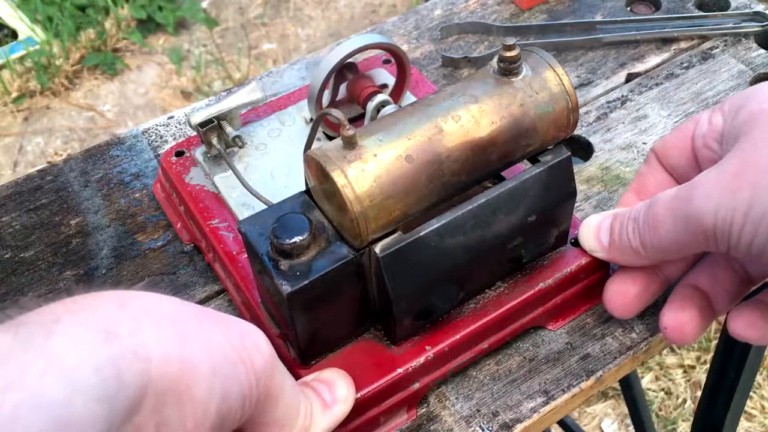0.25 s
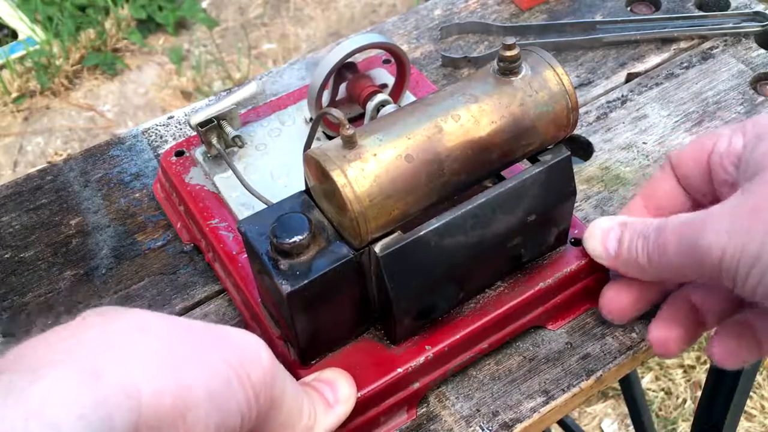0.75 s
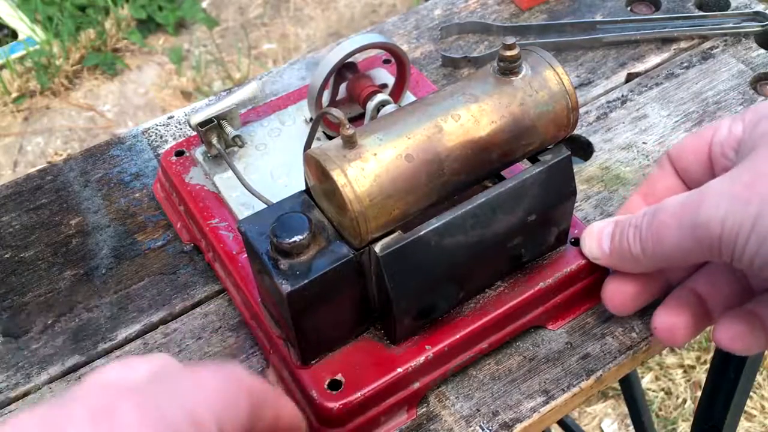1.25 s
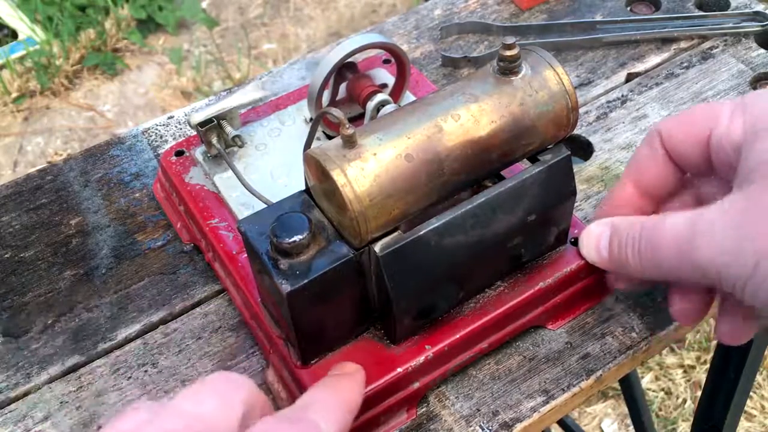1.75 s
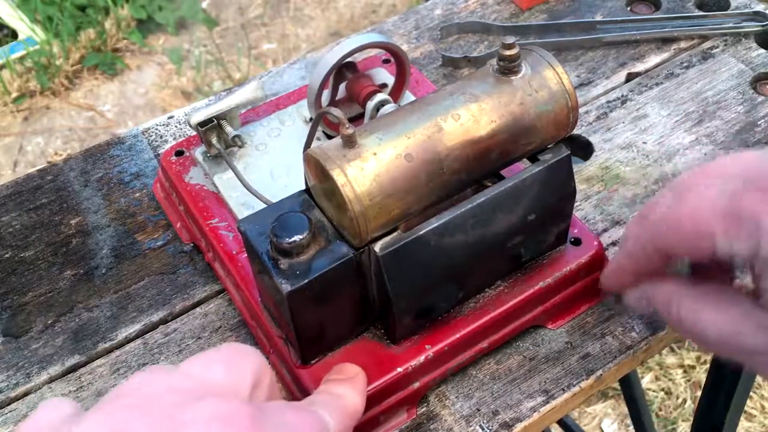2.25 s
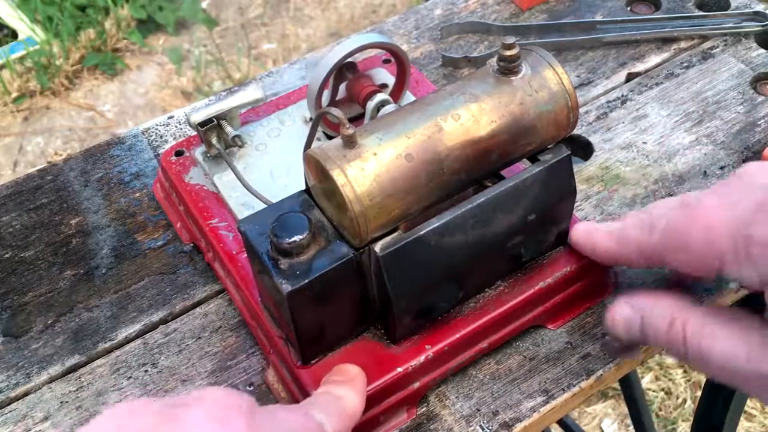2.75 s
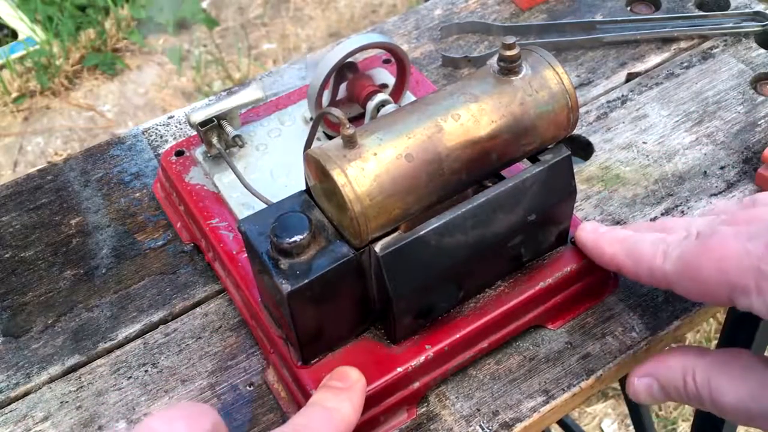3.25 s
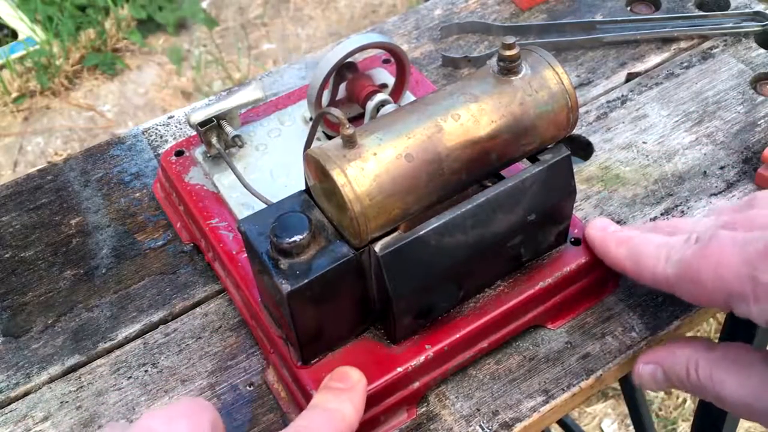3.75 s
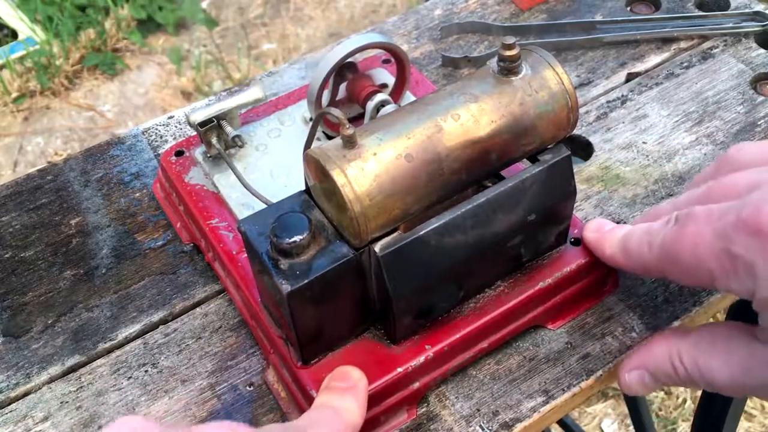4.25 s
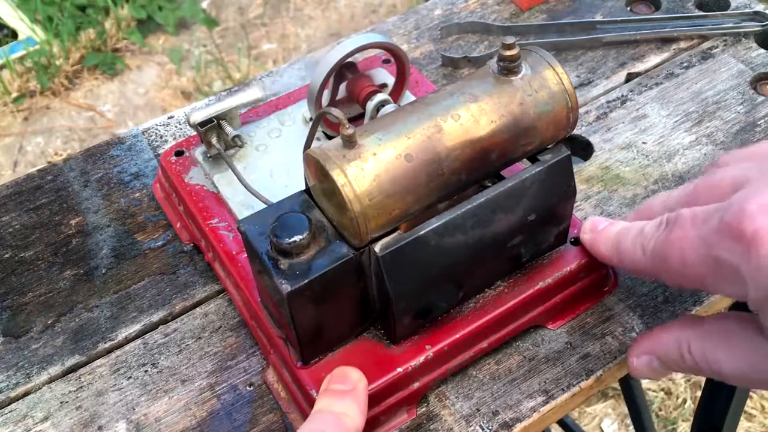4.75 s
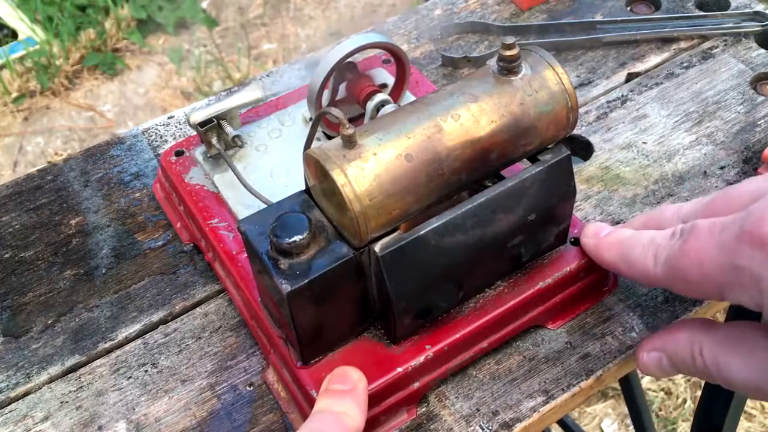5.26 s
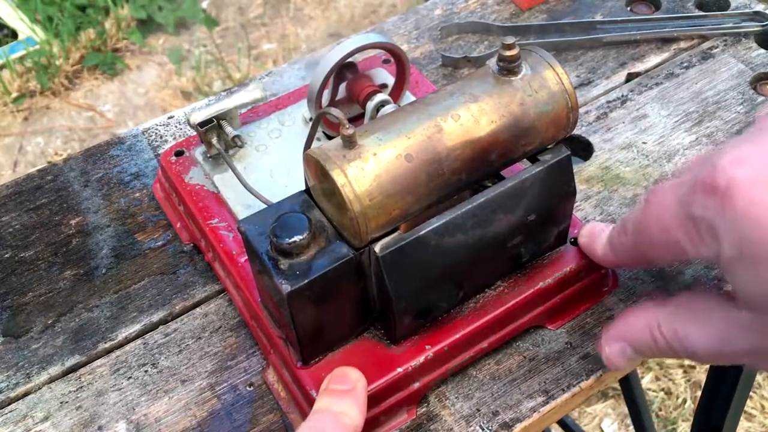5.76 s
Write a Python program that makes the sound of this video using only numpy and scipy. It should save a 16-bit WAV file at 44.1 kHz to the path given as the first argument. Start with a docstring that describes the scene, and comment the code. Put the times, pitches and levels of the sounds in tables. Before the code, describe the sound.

Close-up rapid metallic rattle of a miniature steam engine, hard-knocking at first, then slightly slower and gentler, with faint steam hiss outdoors.

```python
"""A toy steam engine runs on a wooden bench outdoors: fast and hard-knocking at first, a thumb on its base.
The loose crank chatters every turn, ringing the tin base, rim and small metal parts as resonances struck
by impulses; the bench thumps, steam spits as filtered noise, and low tones hum with the wheel.
From the first half second the slack now and then takes up with a hard clack. By three seconds the thumb
has eased, the wheel has slowed to about twenty turns a second, and the knocks are softer to the end."""
import sys
import numpy as np
from scipy import signal
from scipy.fft import rfft, irfft
from scipy.io import wavfile
from scipy.ndimage import uniform_filter1d

SR = 44100
rng = np.random.default_rng(int(sys.argv[2]) if len(sys.argv) > 2 else 0)


def output_pcm(signal):
    """Save a mono or channel-first signal as 16-bit PCM at the path in sys.argv[1].

    Samples are clipped to [-1, 1] before scaling.
    """
    pcm = np.clip(np.atleast_2d(signal).T, -1, 1) * 32767
    wavfile.write(sys.argv[1], SR, np.round(pcm).astype(np.int16))


N = 264600
TIME = np.arange(N) / SR
FREQ = np.fft.rfftfreq(8192, 1 / SR)
EASY_HZ = 20  # easy turning rate; levels and crank positions shift with the rate above it
CONTACT_HZ = 8350  # no contact is short enough to ring the parts much above this


def undb(db):
    """Decibels to gain."""
    return 10 ** (np.asarray(db) / 20)


def unit(x):
    """Scale to an rms of one."""
    return x / np.sqrt(np.mean(x ** 2))


def steady(x, size=17640):
    """Scale to an rms of one over a sliding window, by default every few turns."""
    return x / np.sqrt(uniform_filter1d(x ** 2, size=size))


def curves(table):
    """Each column of a table as a line through time."""
    s, *columns = np.transpose(table)
    return [np.interp(TIME, s, column) for column in columns]


def response(gain):
    """Causal (minimum-phase) impulse response with the given gain at each frequency."""
    cepstrum = irfft(np.log(gain + 1e-9))
    half = len(cepstrum) // 2
    cepstrum[1:half] *= 2
    cepstrum[half + 1:] = 0
    return irfft(np.exp(rfft(cepstrum)))


def body(modes):
    """Impulse response of a set of resonances, softened by contact time, with a peak of one."""
    power = 0
    for hz, width, db in modes:
        detune = (FREQ - hz) / (0.53 * width)
        power = power + (undb(db) / (1 + detune ** 2)) ** 2
    contact = 1 / (1 + (FREQ / CONTACT_HZ) ** 8)
    ring = response(np.sqrt(power * contact))
    return ring / np.abs(ring).max()


def through(x, ring):
    """Pass a signal through an impulse response."""
    return signal.fftconvolve(x, ring)[:N]


def gripped(force, modes, grip):
    """Ring resonances whose balance changes under the thumb."""
    free = body([(hz, width, db) for hz, width, db, change_db in modes])
    pressed = body([(hz, width, db + change_db) for hz, width, db, change_db in modes])
    share = np.clip(grip, 0, 1)
    return through(force * (1 - share), free) + through(force * share, pressed)


def noise(points):
    """Noise shaped to a spectrum, with an rms of one."""
    hz, db = np.transpose(points)
    gain = undb(np.interp(np.log(FREQ + 1), np.log(hz), db))
    return unit(through(rng.standard_normal(N), response(gain)))


def taps(times, sizes):
    """A train of single impulses."""
    inside = (times >= 0) & (times < (N - 1) / SR)
    return np.bincount((times[inside] * SR).astype(int), sizes[inside], N)


def sparse_contacts(per_second):
    """Tiny impacts at random moments, pushing either way."""
    return (rng.random(N) < per_second / SR) * rng.choice([-1, 1], N)


def window(turn, position, width):
    """Opens smoothly once a turn around a crank position."""
    away = (turn - position + .5) % 1 - .5
    return np.exp(-.5 * (away / width) ** 2)


def each_turn(turn, position):
    """A new random value for every pass of a crank position."""
    return rng.standard_normal(256)[np.floor(turn - position + 1.5).astype(int)]


def passes(turn, position):
    """The samples at which the crank passes a position."""
    return np.flatnonzero(np.diff(np.floor(turn - position)) > 0)


def blows(turn, position, scatter_db, jitter_s):
    """One impulse each time the crank passes a position."""
    at = passes(turn, position)
    chance = rng.standard_normal((len(at), 2))
    return taps(at / SR + jitter_s * chance[:, 0], undb(scatter_db * chance[:, 1]))


# spectrum of the open air and burner: (f/Hz, relative level/dB)
AIR_SPECTRUM = [(20, -12), (45, -2), (80, -17), (240, -1), (330, 1.5), (450, -1.5), (700, 6.5), (2000, -9),
                (5000, -12), (9000, -28.5), (16000, -47)]


def open_air():
    """Open air and burner: an unchanging bed of shaped noise."""
    return undb(-45.0) * noise(AIR_SPECTRUM)


# spectrum of the exhaust steam as the microphone hears it, dipping deeply near 10.4 kHz: (f/Hz, relative
# level/dB)
STEAM_SPECTRUM = [(120, -22), (500, -3.5), (1500, 2.5), (4400, 5), (5500, 0), (7000, -8), (9500, -12.5),
                  (10400, -27.5), (11300, -11), (12500, -20.5), (14000, -27), (16000, -65)]


def exhaust(turn, hz):
    """Wet steam leaves the port once a turn, some leaks past the piston, and a faint hiss never stops."""
    puff = window(turn, .42 - 0.028 * (hz - EASY_HZ), width=0.079)
    puff = puff * undb(2.3 * each_turn(turn, .42))  # no two puffs equally strong
    leak = undb(-4.0) * window(turn, 0.096, width=0.07)  # on the power stroke
    return undb(-42.0) * noise(STEAM_SPECTRUM) * (puff + leak + undb(-8.5))


# soft low bumps while the hands shift their grip: (t/s, level/dB, f/Hz, length/s)
GRIP_BUMPS = [(0.179, -39.5, 54.7, 0.0099), (.183, -51, 104, 0.0087), (0.334, -49, 66.4, 0.023),
              (0.45, -47, 49.4, .025), (0.545, -49, 59.4, .016), (1.05, -56, 55, .025),
              (2.065, -47, 99, 0.014), (2.067, -43, 165, 0.0064), (2.402, -52, 90, 0.012)]


def bumps():
    """Dull thuds: low sine tones under short bell-shaped swells."""
    thuds = 0
    for s, db, hz, length in GRIP_BUMPS:
        swell = np.exp(-.5 * ((TIME - s) / length) ** 2)
        tone = np.sqrt(2) * np.sin(2 * np.pi * (hz * TIME + rng.random()))
        thuds = thuds + undb(db) * swell * tone
    return thuds


# hum of the flywheel's unbalance: (multiple of the turning rate, level/dB)
HUM_TONES = [(4, -67), (5, -66.5), (7, -63.5), (9, -65), (11, -63.5), (14, -61), (16, -61.5), (17, -61),
             (18, -65)]
# three low tones that swell and fade: (t/s, near 160 Hz level/dB, near 295 Hz level/dB, near 325 Hz level/dB)
DRONE_LEVELS = [(0, -72, -48.5, -60), (.5, -70, -54, -71), (.8, -71, -71, -50), (1.2, -71, -59, -50),
                (1.7, -60, -74, -62), (2.6, -57.5, -62, -54), (3.25, -57, -74, -57), (3.7, -59.5, -77, -74),
                (4.3, -60.5, -81, -57), (4.7, -58, -60, -58), (5.3, -63.5, -69, -63), (6, -63, -77, -53)]
# the pitch of those three tones: (multiples of the turning rate)
DRONE_TONES = (8, 13, 15)
HUM_TURN = 0.1003  # crank position at which the hum crests (turns)


def hum(turn):
    """Clean low tones locked to the flywheel, cresting together on the power stroke; three swell and fade."""
    tones = 0
    for multiple, db in [*HUM_TONES, *zip(DRONE_TONES, curves(DRONE_LEVELS))]:
        tone = np.sqrt(2) * np.cos(2 * np.pi * round(multiple) * (turn - HUM_TURN))
        tones = tones + undb(db) * tone
    return tones


# shoves on the bench within one turn:
# (crank position/turns, shift/turns per Hz, relative sway level/dB, relative drumming level/dB)
BENCH_SHOVES = [(.085, -0.0201, 2, 13), (-.33, -0.0436, -4, 13), (-.12, -0.00079, -21, 6)]
# slow sway of the bench boards: (f/Hz, width/Hz, relative level/dB)
BOARD_MODES = [(82, 35, -5), (124, 24, 1), (179, 22.5, -6.5), (210.5, 13, 6)]
# loudness of that sway: (t/s, level/dB)
SWAY_LEVEL = [(0, -57), (.7, -58.5), (1.3, -70), (1.8, -66), (2.2, -63), (6, -58.5)]
# the base drumming on the boards: (f/Hz, width/Hz, relative level/dB, change under the thumb/dB)
DRUM_MODES = [(312, 37, -4.5, 9), (326, 33, 2.5, -2.5), (384.5, 73, -1, -5.5), (506.6, 22.5, 6.5, -7),
              (546, 27, 8, -1), (604, 54, 6.5, -3), (646, 110, -4.5, 12)]
DRUM_DB, DRUM_DB_PER_HZ = -46.5, 2  # level at the easy speed, and its rise with speed


def bench(turn, hz, grip):
    """The unbalanced piston shoves the base against the boards, nearly alike every turn, over a steady scuff."""
    extra_hz = hz - EASY_HZ
    on_boards, on_base = 0, 0
    for position, shift, sway_db, drum_db in BENCH_SHOVES:
        shove = blows(turn, position + shift * extra_hz, scatter_db=1.3, jitter_s=.00006)
        on_boards = on_boards + undb(sway_db) * shove
        on_base = on_base + undb(drum_db) * shove
    scuff = rng.standard_normal(N)
    level_db, = curves(SWAY_LEVEL)
    sway = undb(level_db) * steady(through(on_boards, body(BOARD_MODES)))
    drumming = steady(gripped(unit(on_base) + scuff, DRUM_MODES, grip))
    return sway + undb(DRUM_DB + DRUM_DB_PER_HZ * extra_hz) * drumming


# flywheel rim: (f/Hz, width/Hz, relative level/dB)
RIM_MODES = [(2317, 84, 8), (2140, 210, -7.5), (1726, 130, -6)]
# loudness of the rim's ring: (t/s, level/dB)
RIM_LOUDNESS = [(0, -45.5), (.7, -40.5), (1.25, -43.5), (1.7, -37), (2.15, -37.5), (2.35, -45), (3, -41),
                (3.7, -45.5), (4.2, -40.5), (4.9, -39.5), (5.3, -47.5), (6, -50)]
# where the bearing rubs the rim hardest: crank position (turns), shift (turns per Hz), half-width (turns)
RIM_TURN, RIM_TURN_PER_HZ, RIM_WIDTH = -0.13, 0.057, 0.18


def rim(turn, hz):
    """The rim sings thinly and evenly, rubbed by its bearing on the out stroke and briefly on the way back."""
    extra_hz = hz - EASY_HZ
    out_stroke = window(turn, RIM_TURN + RIM_TURN_PER_HZ * extra_hz, width=RIM_WIDTH)
    back_stroke = undb(-1.0) * window(turn, .47 - 0.057 * extra_hz, width=0.025)
    rubbing = sparse_contacts(2000) * (out_stroke + back_stroke)
    level_db, = curves(RIM_LOUDNESS)
    return undb(level_db) * steady(through(rubbing, body(RIM_MODES)), size=2200)


# cylinder, crank and flywheel, also rung by the knocks and the chatter: (f/Hz, width/Hz, relative level/dB)
METAL_MODES = [(2142, 344, -12), (2320, 55, -8.5), (2817, 257, -4.5), (2980, 101, 4.5), (3056, 120, -1.5),
               (3270, 147, -3.5), (3470, 500, -18), (4140, 150, -16.5), (4334, 38, -15), (4520, 330, -22),
               (5300, 230, -28), (6000, 220, -33), (6000, 1850, -39)]
# crank position (turns), its shift (turns per Hz), half-width (turns)
TICK_TURN, TICK_TURN_PER_HZ, TICK_WIDTH = 0.023, -0.043, 0.02
TICK_DB, TICK_DB_PER_HZ = -49.5, 1  # level at the easy speed, and its rise with speed
TICK_ABOVE_HZ = 3800  # only the modes above this ring


def ticks(turn, hz):
    """Steel meets steel as each power stroke begins: a crisp run of ticks in the highest modes, never alike."""
    extra_hz = hz - EASY_HZ
    position = TICK_TURN + TICK_TURN_PER_HZ * extra_hz + 0.017 * each_turn(turn, TICK_TURN)
    run = window(turn, position, width=TICK_WIDTH) * undb(2.0 * each_turn(turn, TICK_TURN))
    high_modes = [mode for mode in METAL_MODES if mode[0] > TICK_ABOVE_HZ]
    ring = through(sparse_contacts(1500) * run, body(high_modes))
    return undb(TICK_DB + TICK_DB_PER_HZ * extra_hz) * steady(ring)


# light ticks of the crank pin within one turn:
# (crank position/turns, shift/turns per Hz, strike level at the easy speed/dB, rise/dB per Hz)
SLACK_TICKS = [(-.36, -.032, -32, 1.6), (-.15, 0.02, -30.5, 1)]
# crank pin struck steel on steel, also heard in clacks and knocks: (f/Hz, width/Hz, relative level/dB)
PIN_MODES = [(2294, 250, -4.5), (2992, 210, 2), (3302, 124, 3.5), (3520, 350, -6.5), (4210, 420, -14.5),
             (4470, 270, -20.5), (5400, 1540, -25), (9500, 8700, -38)]
REBOUND_S, REBOUND_DB = 0.001957, 1.5  # delay after each light tick, and gain before scatter


def slack(turn, hz):
    """Twice a turn the load on the crank pin reverses: a crisp tick and one rebound, each of varying force."""
    extra_hz = hz - EASY_HZ
    force = 0
    for position, shift, db, db_per_hz in SLACK_TICKS:
        place = position + shift * extra_hz
        tick = blows(turn, place, scatter_db=3.5, jitter_s=.001)
        rebound = blows(turn, place + REBOUND_S * hz, scatter_db=-2, jitter_s=0.000978)
        force = force + (tick + undb(REBOUND_DB) * rebound) * undb(db + db_per_hz * extra_hz)
    return through(force, body(PIN_MODES))


# hard clacks of the crank pin: (t/s, strike level/dB, strike on the base relative to the pin/dB)
HARD_CLACKS = [(.374, -23.5, -6), (0.551, -19.5, -2.5), (0.685, -21, 1), (1.05, -21, -20),
               (1.2343, -17.5, -22), (1.327, -21, -13), (1.389, -18, 4), (1.4185, -16.5, -6),
               (1.512, -24, -19), (1.607, -19.5, -16), (1.906, -26, 3), (1.947, -20.5, -7),
               (2.137, -19, -1), (2.3727, -18, -1), (2.383, -18, -8), (2.4798, -18.5, 2), (2.729, -21, -2),
               (2.829, -21, 1), (2.9297, -18.5, -3), (3.029, -20, 0), (3.13, -23, 3), (3.227, -23, 4),
               (3.3307, -17.5, -2), (3.381, -28, -14), (3.43, -21, -2), (4.0787, -18, 0), (4.127, -19, -12),
               (4.2755, -16.5, -7), (4.37, -17.5, -6), (4.427, -22.5, 1), (4.462, -23.5, 3.5),
               (5.0573, -20, -21), (5.0662, -16.5, -11), (5.2182, -18, -0.5), (5.268, -20, 3),
               (5.517, -21, -6), (5.618, -22, 0), (5.668, -24, -1), (5.708, -22, 6), (5.767, -20, -9)]
# tin base, also rung by the knocks and the chatter:
# (f/Hz, width/Hz, relative level/dB, change under the thumb/dB)
BASE_MODES = [(1000, 150, -32.5, 13), (1047.5, 150, -1.5, -2.5), (1151, 137, 3, -1), (1315, 210, -1, 1),
              (1432, 106, 1, 3.5), (1762, 165, -9.5, -5)]
BOUNCES = 5  # contacts in one clack
BOUNCE_GAP_S, BOUNCE_LOSS_DB = 0.0018, -1.02  # nominal gap and change from one contact to the next


def clacks(grip):
    """The crank pin hits the end of its slack and bounces a few times, each a little softer."""
    s, db, base_db = np.transpose(HARD_CLACKS)
    gaps = BOUNCE_GAP_S * rng.uniform(0.55, 1.6, (len(s), BOUNCES))
    times = (s[:, None] + np.cumsum(gaps, axis=1) - gaps[:, :1]).ravel()
    level_db = db[:, None] + BOUNCE_LOSS_DB * np.arange(BOUNCES)
    on_pin = taps(times, undb(level_db).ravel())
    on_base = taps(times, undb(level_db + base_db[:, None]).ravel())
    return undb(2.0) * through(on_pin, body(PIN_MODES)) + gripped(on_base, BASE_MODES, grip)


# force of the usual knock on the tin base: (strike level at the easy speed/dB, rise/dB per Hz, spread/dB)
KNOCK_ON_BASE = (-21.5, 2.9, 2.2)
# the same on the metal parts: (strike level at the easy speed/dB, rise/dB per Hz, spread/dB)
KNOCK_ON_METAL = (-21, 1.0, 3)
# power strokes with their own forces: (t/s, base strike level/dB, metal strike level/dB)
HARD_KNOCKS = [(0.037, -13.5, -15.5), (.084, -11.5, -17.5), (0.125, -17, -15), (.172, -12, -26),
               (0.215, -14.5, -14.5), (0.26, -12, -19), (0.303, -12.5, -14.5), (0.348, -8.5, -14),
               (0.393, -20, -13.5), (.438, -12.5, -14), (.481, -9.5, -13), (0.525, -9.5, -17),
               (0.66, -10.5, -11.5), (.706, -17, -24), (0.752, -9, -13.5), (0.887, -33, -12.5),
               (1.027, -9.5, -34), (1.118, -16, -14), (1.163, -12, -34), (1.211, -10.5, -17),
               (1.301, -15.5, -15.5), (1.485, -10.5, -17.5), (1.533, -18, -24), (1.822, -15, -12.5),
               (1.864, -22, -21), (2.055, -14, -14), (2.195, -13.5, -17), (2.294, -14.5, -25),
               (2.442, -26, -16.5), (2.891, -15.5, -15), (3.091, -20, -14.5), (3.191, -18.5, -15.5),
               (4.04, -16, -16.5), (4.238, -24, -16), (4.336, -16.5, -16.5), (4.533, -17, -17),
               (5.028, -11.5, -22), (5.179, -28, -17), (5.328, -30, -17), (5.529, -15.5, -13.5),
               (5.627, -25, -14.5), (5.779, -16.5, -16.5), (5.975, -27, -15.5)]
# crank position (turns), its shift (turns per Hz) and its random wander (turns)
STROKE_TURN, STROKE_TURN_PER_HZ, STROKE_WANDER = .052, -0.02666, 0.02044
SPENT_S, SPENT_DB = .024, -9.5  # a clack this shortly before takes some of the knock's force


def power_strokes(turn, hz):
    """One knock a turn, harder at speed and softer just after a clack; rows of (t/s, base dB, metal dB)."""
    at = passes(turn, STROKE_TURN + STROKE_TURN_PER_HZ * (hz - EASY_HZ))
    s = at / SR + STROKE_WANDER * rng.standard_normal(len(at)) / hz[at]
    since_clack = s[:, None] - np.array(HARD_CLACKS)[:, 0]
    spent_db = SPENT_DB * ((since_clack > 0) & (since_clack < SPENT_S)).any(axis=1)
    levels = []
    for db, db_per_hz, spread_db in (KNOCK_ON_BASE, KNOCK_ON_METAL):
        chance_db = spread_db * rng.uniform(-0.86, 1, len(at))
        levels.append(db + db_per_hz * (hz[at] - EASY_HZ) + spent_db + chance_db)
    rows = np.column_stack([s, *levels])
    for hard in HARD_KNOCKS:  # each replaces the usual knock nearest in time
        rows[np.argmin(np.abs(s - hard[0]))] = hard
    return rows


RATTLE_GAP_S = .0018  # nominal gap between the contacts of one knock
EDGE_DB, EDGE_SPREAD_DB = -5.5, 9.5  # the pin's strike against the metal parts', and its spread either way


def rattles(rows, grip):
    """Each power stroke rattles up to one firm knock and ebbs away; the crank pin adds a varying edge."""
    s, base_db, metal_db = np.transpose(rows)
    place = np.arange(-3, 4)  # contacts before and after the firm one
    jitter = .3 * (place != 0) * rng.standard_normal((len(s), len(place)))
    times = (s[:, None] + RATTLE_GAP_S * (place + jitter)).ravel()
    away = np.sqrt(np.abs(place))
    on_base = taps(times, np.outer(undb(base_db), undb(-5.5 * away)).ravel())
    on_metal = taps(times, np.outer(undb(metal_db), undb(-3.5 * away)).ravel())
    chance = rng.uniform(-0.973, 1, (len(s), 2))
    edge_db = metal_db + EDGE_DB + EDGE_SPREAD_DB * chance[:, 1]
    on_pin = taps(s + RATTLE_GAP_S * chance[:, 0], undb(edge_db))
    base = undb(-0.97) * gripped(on_base, BASE_MODES, grip)
    metal = undb(-2.5) * through(on_metal, body(METAL_MODES))
    return base + metal + through(on_pin, body(PIN_MODES))


# runs of chatter within one turn: (crank position/turns, shift/turns per Hz, half-width/turns,
# relative base level/dB, relative metal level/dB, change/dB per Hz)
CHATTER_RUNS = [(0.063, -0.032, 0.096, -2.5, 3, 0.6), (-0.0061, -0.05, 0.13, -5.5, -6, 2.5),
                (-0.304, -0.036, 0.071, -3.5, -6.5, -2.5), (0.151, -0.0097, 0.025, -12.5, -3, 1),
                (0.479, -0.051, 0.054, -8, -5, 1.5), (-0.28, -0.037, 0.09, -17.5, -11, 7)]
# levels at the easy speed (dB), and their rise (dB per Hz): the faster the wheel, the harder it shakes
BASE_DB, BASE_DB_PER_HZ = -31, 0.7
METAL_DB, METAL_DB_PER_HZ = -32.5, 0.62


def chatter(turn, hz, grip):
    """Runs of tiny impacts as the loose bearings change sides ring the tin base and the metal parts."""
    extra_hz = hz - EASY_HZ
    base_power, metal_power = undb(-12.5) ** 2, undb(-12.5) ** 2  # the bearings never stop rubbing
    for position, shift, width, base_db, metal_db, speed_db in CHATTER_RUNS:
        wander = 0.0087 * each_turn(turn, position)
        run = window(turn, position + shift * extra_hz + wander, width)
        run = run * undb(speed_db * extra_hz + 1.3 * each_turn(turn, position))
        base_power = base_power + (run * undb(base_db)) ** 2
        metal_power = metal_power + (run * undb(metal_db)) ** 2
    contacts = unit(sparse_contacts(3400) * undb(4.0 * rng.standard_normal(N)))
    # the piston lands once in the middle of the main run, harder at speed
    landing = blows(turn, .035 - 0.02043 * extra_hz, scatter_db=-5.5, jitter_s=0.00094)
    landing = unit(landing * undb(1.0 * extra_hz))
    on_base = unit(contacts * np.sqrt(base_power)) + undb(-13.5) * landing
    on_metal = unit(contacts * np.sqrt(metal_power)) + undb(-22.5) * landing
    base = steady(gripped(on_base, BASE_MODES, grip))
    metal = steady(through(on_metal, body(METAL_MODES)))
    base = undb(BASE_DB + BASE_DB_PER_HZ * extra_hz) * base
    return base + undb(METAL_DB + METAL_DB_PER_HZ * extra_hz) * metal


# flywheel speed: (t/s, turning rate f/Hz)
WHEEL_SPEED = [(0.0, 22.9), (0.5, 22.36), (1.0, 21.808), (1.5, 21.406), (2.0, 21.111), (2.5, 20.255),
               (3.0, 19.845), (3.5, 20.03), (4.0, 20.114), (4.5, 20.356), (5.0, 20.05), (5.5, 19.953),
               (6.0, 20.491)]
# how hard a thumb presses the base onto the bench: (t/s, pressure/0-1)
THUMB_PRESSURE = [(0, 0.86), (.55, 1), (1.2, 0.7), (1.7, 0.13), (6, 0.1)]
START_TURN = .101  # crank position at the start (turns)


def scene():
    """The flywheel's angle times the engine's moving parts, and its speed sets how hard they strike."""
    hz, = curves(WHEEL_SPEED)
    grip, = curves(THUMB_PRESSURE)
    turn = START_TURN + np.cumsum(hz) / SR
    steam_and_air = open_air() + exhaust(turn, hz)
    boards = bumps() + hum(turn) + bench(turn, hz, grip)
    thin_metal = rim(turn, hz) + ticks(turn, hz)
    knocks = slack(turn, hz) + clacks(grip) + rattles(power_strokes(turn, hz), grip)
    return (steam_and_air + boards + thin_metal + knocks + chatter(turn, hz, grip))[None]


def record(dry):
    """The microphone drops the deepest bass and cuts the top."""
    lean = signal.sosfilt(signal.butter(3, 42, "high", fs=SR, output="sos"), dry)
    return signal.sosfilt(signal.ellip(10, .2, 80, 15850, fs=SR, output="sos"), lean)


dry = scene()
out = record(dry)
output_pcm(out)
```